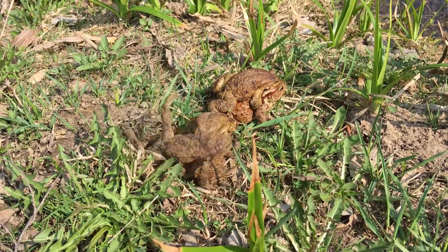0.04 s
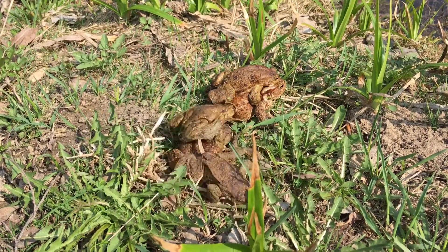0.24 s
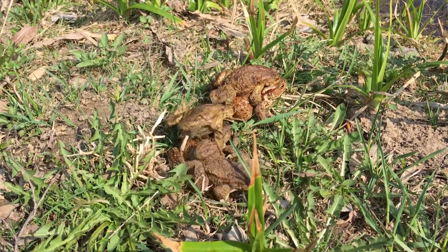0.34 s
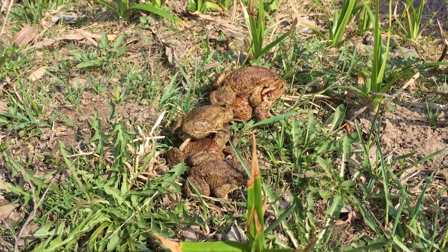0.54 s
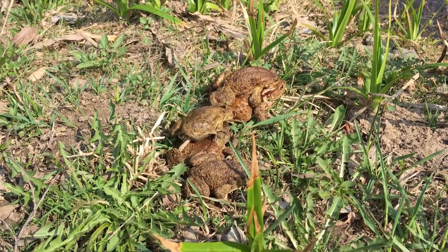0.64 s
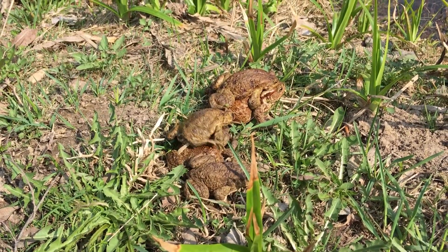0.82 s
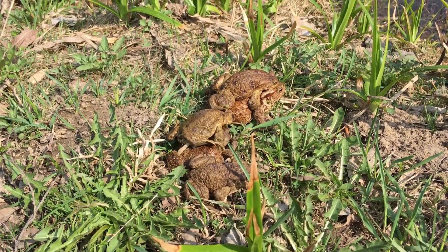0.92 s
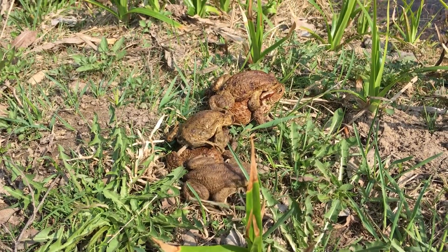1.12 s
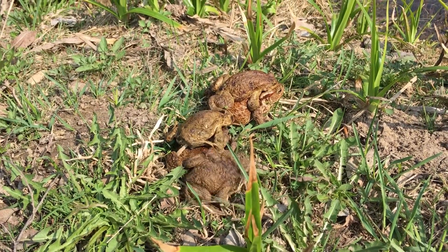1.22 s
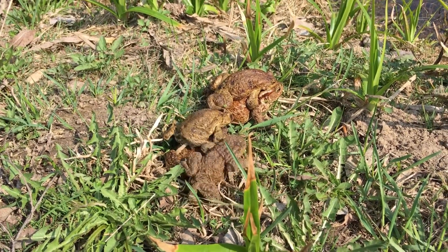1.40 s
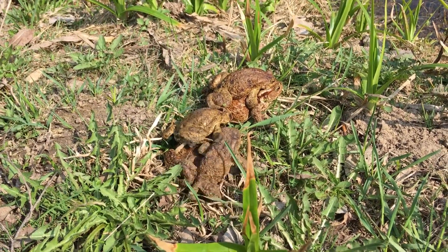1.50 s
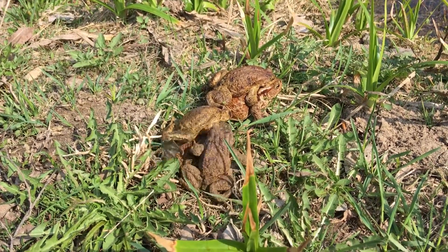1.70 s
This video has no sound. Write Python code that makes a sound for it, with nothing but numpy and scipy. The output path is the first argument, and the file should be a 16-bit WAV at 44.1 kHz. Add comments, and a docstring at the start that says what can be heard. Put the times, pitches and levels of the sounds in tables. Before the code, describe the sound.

Toads give six short, falling chirps in the grass, with a light rustle.

```python
"""Outdoors in the grass, toads clamber over each other and give six short release calls.
A low rumble lies underneath, while the grass rustles and ticks under their feet.
In each call the voice box opens in a few quick bursts, then stays open for one falling,
fading note; two calls are thin and squeezed. Midway, a faint, far hoot slides upward."""
import sys
import numpy as np
from scipy import signal
from scipy.fft import rfft, irfft, next_fast_len
from scipy.io import wavfile
from scipy.ndimage import map_coordinates

SR = 44100
rng = np.random.default_rng(int(sys.argv[2]) if len(sys.argv) > 2 else 0)


def transcribe(signal):
    """Save signal, clipped to [-1, 1], as a 16-bit WAV file at the path in sys.argv[1]."""
    frames = np.atleast_2d(signal).T
    limited = np.clip(frames, -1, 1)
    pcm = np.round(limited * 32767).astype(np.int16)
    wavfile.write(sys.argv[1], SR, pcm)


N = 77175

# Tone colour of the outdoor rumble (frequency [Hz], level [dB])
RUMBLE_COLOUR = [(15, -52), (30, -10), (55, 2.5), (90, -3), (130, -7), (190, -8.5), (270, -15.5),
                 (500, -20.5), (1000, -26.5), (2000, -36.5), (5000, -39.5), (15000, -50.5)]
# How the rustle swells and fades under the toads' feet (time [s], relative level [dB])
RUSTLE_LEVELS = [(0, -75), (.11, -72), (.145, -62), (.19, -51.5), (.26, -52), (.30, -56), (.33, -61),
                 (.43, -63.5), (.53, -63.5), (.57, -74), (.8, -78), (1.2, -77), (1.30, -66), (1.39, -73),
                 (1.50, -68), (1.54, -75), (1.605, -75), (1.63, -64.5), (1.71, -70), (1.75, -62)]
# Tone colour of the rustling blades (frequency [Hz], level [dB])
GRASS_COLOUR = [(600, -20), (1500, -17), (2800, -7.5), (5000, -8.5), (8000, -5), (11000, -3.5), (14000, 1),
                (15900, -5.5)]
# Ticks of stems and soft thuds of feet
# (time [s], level [dB], centre frequency [Hz], width [octaves], length [s])
TICKS_AND_THUDS = [(0.1503, -51, 2500, .13, 0.0046), (0.213, -41, 10100, 0.66, 0.0018),
                   (0.3867, -44, 9000, 5.4, 0.005), (0.38, -50.5, 55, 0.74, .03),
                   (0.552, -57.5, 1150, 0.45, .005), (0.66, -62, 13100, 0.33, .002),
                   (0.723, -52, 48, 0.37, 0.063), (1.680, -52.5, 9500, 3, 0.0013)]
# The toads' calls (start [s], first gap [s], burst spacing [s], bursts [count], first burst length [s],
# call length [s], first pitch [Hz], held pitch [Hz], pitch fall [Hz], level [dB], held note gain [dB],
# treble gain [dB], nasal gain [dB], squeeze [0-1])
CALLS = [ (0.2352, 0.0088, 0.0057, 4, 0.0054, 0.085, 1110, 1141, 50, -23.5, 1, -3, -2, 0.2),
         (0.334, 0.0046, .0059, 6, 0.0027, 0.064, 1261, 1119, 75, -34, -8, 2, 1.5, 0.92),
         (0.5878, 0.00645, 0.0079, 3, 0.00664, 0.068, 1083, 1092, 54.4, -25, 0, 1.5, 2.5, 0.24),
         (0.7019, 0.00622, 0.006, 4, .0040, 0.05, 1186, 1073, 59.3, -33.5, -2.5, 3.5, -2, 0.88),
         (0.913, 0.0089, .0064, 5, 0.00409, 0.082, 1156, 1146, 149, -23, -1.5, -1, -3.5, 0.29),
         (1.4417, 0.0081, 0.0058, 6, 0.004, 0.078, 1172, 1110, 82, -25, -2.5, 1.5, 6.5, 0.23)]
# How an open throat colours the overtones (frequency [Hz], level [dB])
OPEN_THROAT = [(1300, 0), (2000, -22.5), (2350, -18), (3300, -36.5), (4400, -37), (5000, -49.5),
               (5700, -29.5), (6600, -44.5), (7600, -50), (8700, -41), (9700, -34.5), (10800, -63),
               (12300, -33.5), (13200, -45), (14400, -23.5), (15800, -37)]
# How a squeezed throat colours them (frequency [Hz], level [dB])
SQUEEZED_THROAT = [(1400, -20), (2200, -23), (3500, -13.5), (5000, -23), (7200, -28.5), (10000, -20.5),
                   (11500, -14.5), (13500, -23.5), (15300, -18)]
# Tone colour of the air escaping in a call (frequency [Hz], level [dB])
AIR_COLOUR = [(700, -11), (1500, 7), (3500, 3), (7000, -38), (11000, -2), (15000, 1.5)]


def amp(db):
    """Turn decibels into a gain."""
    return 10 ** (np.asarray(db) / 20)


def unit(x):
    """Scale to an average strength (rms) of 1."""
    return x / np.sqrt(np.mean(x ** 2) + 1e-20)


def level_at(colour, hz):
    """Look up a tone colour's level at a frequency."""
    freqs, levels = np.transpose(colour)
    return np.interp(np.log(hz + 1), np.log(freqs + 1), levels)


def wobble(per_s):
    """A smooth curve through per_s random values a second."""
    return map_coordinates(rng.standard_normal(N // 8), [np.arange(N) * per_s / SR], mode="wrap")


def filtered(x, response):
    """Scale each frequency in x by response(hz)."""
    size = next_fast_len(N + SR // 4)
    return irfft(rfft(x, size) * response(np.fft.rfftfreq(size, 1 / SR)), size)[:N]


def noise(colour):
    """Noise of strength 1 with the given tone colour."""
    return unit(filtered(rng.standard_normal(N), lambda hz: amp(level_at(colour, hz))))


def add(out, start_s, x):
    """Mix x into out from start_s on."""
    i = max(round(start_s * SR), 0)
    out[i:i + len(x)] += x[:len(out) - i]


def rumble(level_db=-56.5, sway_db=0.6):
    """The low outdoor background sways gently in level."""
    return amp(level_db - sway_db * wobble(6.2)) * noise(RUMBLE_COLOUR)


def grass(snaps_per_s=130, snap_s=0.0003, snap_db=-8.5):
    """Blades swish and give tiny snaps as a toad pushes through them."""
    level_db = 2 + np.interp(np.arange(N) / SR, *np.transpose(RUSTLE_LEVELS))
    flicker = amp(2.2 * wobble(700) + 0.8 * wobble(44.43))  # fine grain plus a slower sway
    clicks = (rng.random(N) < snaps_per_s / SR) * rng.exponential(size=N)
    snap_fade = np.exp(-np.arange(SR // 100) / SR / snap_s)
    snaps = signal.fftconvolve(clicks, snap_fade)[:N]
    swish = unit(flicker * noise(GRASS_COLOUR))
    crackle = amp(snap_db) * unit(snaps * noise(GRASS_COLOUR))
    return amp(level_db) * (swish + crackle)


def ticks_and_thuds():
    """Stems tick and feet thud: each is a brief puff of high or low noise."""
    out, t = np.zeros(N), np.arange(SR // 8) / SR
    for start, level_db, centre_hz, octaves, length in TICKS_AND_THUDS:
        hiss = rng.standard_normal(N)
        band = filtered(hiss, lambda hz: np.exp(-.5 * (np.log2((hz + 1) / centre_hz) / octaves) ** 2))
        u = 2 * t / length
        puff = u * np.exp((1 - u ** 2) / 2)
        add(out, start, amp(level_db) * puff * unit(band)[:len(t)])
    return out


def voice_box_effort(t, openings, burst_s, length, held_db, rise_s=0.0041, release_s=0.018):
    """A call's strength: the voice box opens in ever longer bursts, then stays open and runs down."""
    held_at = openings[-1]
    fade = 1 - 0.94 * (t - held_at) / (length - held_at)
    effort = amp(held_db) * np.clip((t - held_at) / rise_s, 0, 1) * fade
    effort *= np.clip((length - t) / release_s, 0, 1)
    for k, start in enumerate(openings[:-1]):
        progress = np.clip((t - start) / (burst_s + k * 0.00072), 0, 1)
        burst = np.abs(np.sin(np.pi * progress ** 0.96)) ** 1.346  # rises a bit faster than it falls
        effort = np.maximum(effort, burst * amp(-2 * 0.17 ** k))  # the first burst is the weakest
    return effort


def release_call(gap, spacing, bursts, burst_s, length, first_hz, held_hz, fall_hz,
                 level_db, held_db, treble_db, nasal_db, squeeze):
    """The voice box stutters, then holds a note; the throat colours it and air puffs out."""
    t = np.arange(int(length * SR)) / SR
    openings = np.append(0, gap + spacing * np.arange(bursts))
    held_at = openings[-1]
    effort = voice_box_effort(t, openings, burst_s, length, held_db)
    # Each opening starts higher, brighter and breathier, then settles.
    since_opening = t - openings[np.searchsorted(openings, t, side="right") - 1]
    pitch_kick = 0.15 * np.exp(-since_opening / 0.0019) * np.interp(t, [0, held_at], [1, .5])
    puff = np.exp(-since_opening / 0.0023)
    bright_db = treble_db + 9.5 * puff - 99 * (t - held_at)  # the call dulls as it goes
    # The pitch shakes in the bursts; a squeezed call stays rough into its held note.
    roughness = np.interp(t, [0, held_at, length], [0.025, 0.003 + squeeze * 0.031, 0.003])
    shake = roughness * wobble(1100)[:len(t)]
    glide = np.interp(t, [0, held_at, length], [first_hz, held_hz, held_hz - fall_hz])
    pitch = glide * (1 + pitch_kick + shake)
    phase = 2 * np.pi * np.cumsum(pitch) / SR
    voice = np.sin(phase)
    nasal_hz, nasal_width_hz, bright_hz = 3350, 570, 11000
    for k in range(2, 16):
        hz = k * pitch
        colour_db = (1 - squeeze) * level_at(OPEN_THROAT, hz) + squeeze * level_at(SQUEEZED_THROAT, hz)
        colour_db += nasal_db * np.exp(-.5 * ((hz - nasal_hz) / nasal_width_hz) ** 2)
        colour_db -= 7.5 * np.clip(1 - t / held_at, 0, 1) / (k - 1)  # low overtones start weak
        colour_db += 2.5 * wobble(244)[:len(t)]  # each overtone flutters
        height = hz / bright_hz
        gain = amp(colour_db + bright_db * height) * effort ** (0.18 * height)  # louder is brighter
        voice += gain * np.sin(k * phase + rng.normal(0, 0.28))
    air_db = treble_db - 17.5 + 4 * squeeze
    air = amp(air_db) * puff * noise(AIR_COLOUR)[:len(t)]
    return amp(level_db) * effort * (voice + air)


def toads():
    """The toads give each call at its moment."""
    out = np.zeros(N)
    for start, *call in CALLS:
        add(out, start, release_call(*call))
    return out


def echo(x, level_db=-30, fade_s=0.12):
    """The surroundings scatter back a weak tail that drops 60 dB in fade_s."""
    t = np.arange(SR // 4) / SR
    tail = rng.standard_normal(len(t)) * amp(-60 * t / fade_s)
    return amp(level_db) * signal.fftconvolve(x, tail / np.linalg.norm(tail))[:N]


def hoot(start_s=0.65, length_s=0.066, from_hz=417.3, to_hz=644, level_db=-59.5):
    """A soft, distant tone slides upward."""
    out, progress = np.zeros(N), np.linspace(0, 1, int(length_s * SR))
    pitch = from_hz + (to_hz - from_hz) * progress ** 2
    tone = np.sin(2 * np.pi * np.cumsum(pitch) / SR)
    add(out, start_s, amp(level_db) * np.sin(np.pi * progress) * tone)
    return out


def scene():
    """Toads and grass close by, the hoot and rumble behind, in one channel."""
    calls = toads()
    return (calls + echo(calls) + grass() + ticks_and_thuds() + hoot() + rumble())[None]


def record(dry):
    """Cut away the very highest treble."""
    top_hz = 16000
    return np.array([filtered(x, lambda hz: 1 / np.sqrt(1 + (hz / top_hz) ** 200)) for x in dry])


dry = scene()
out = record(dry)
transcribe(out)
```